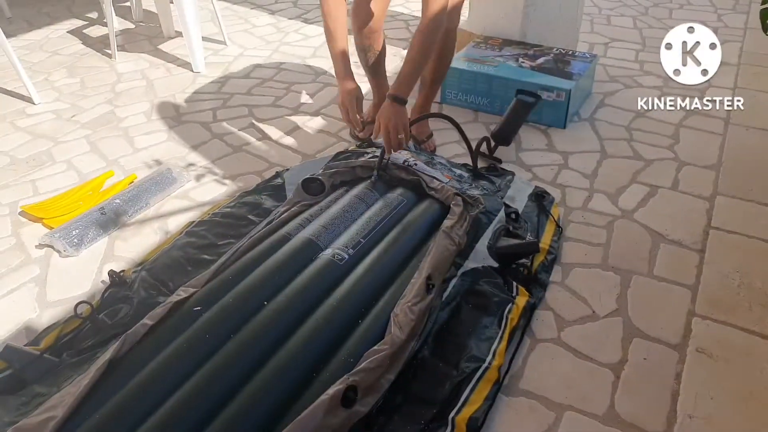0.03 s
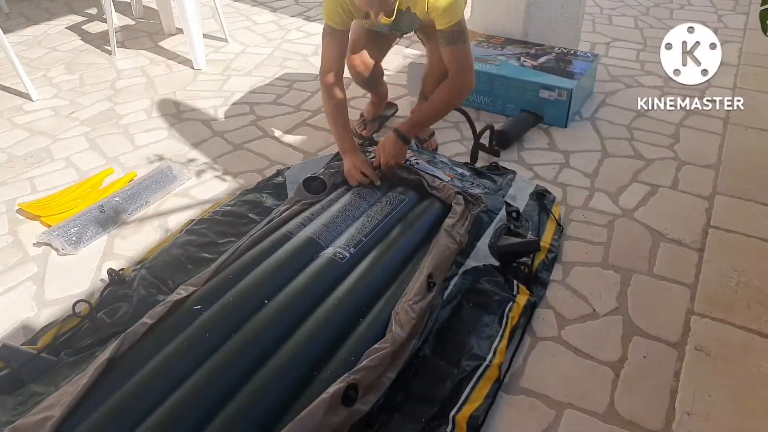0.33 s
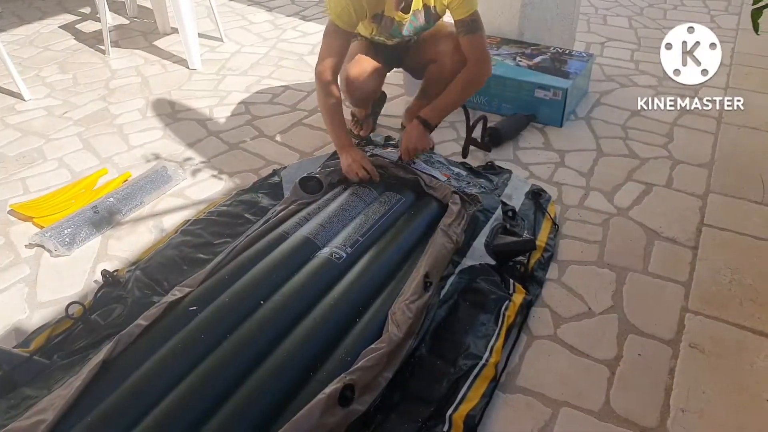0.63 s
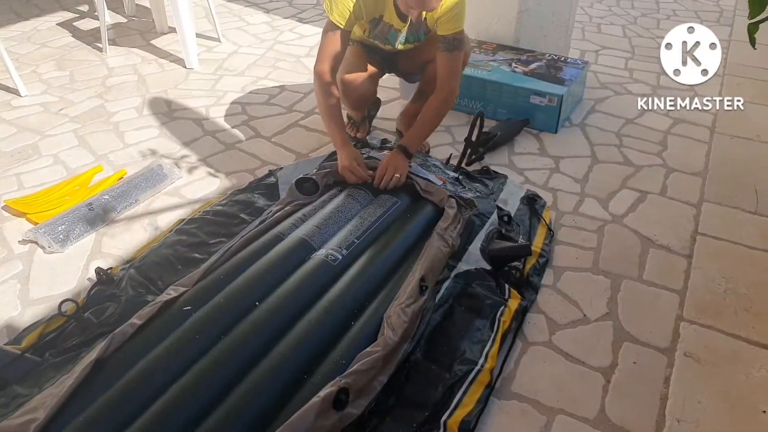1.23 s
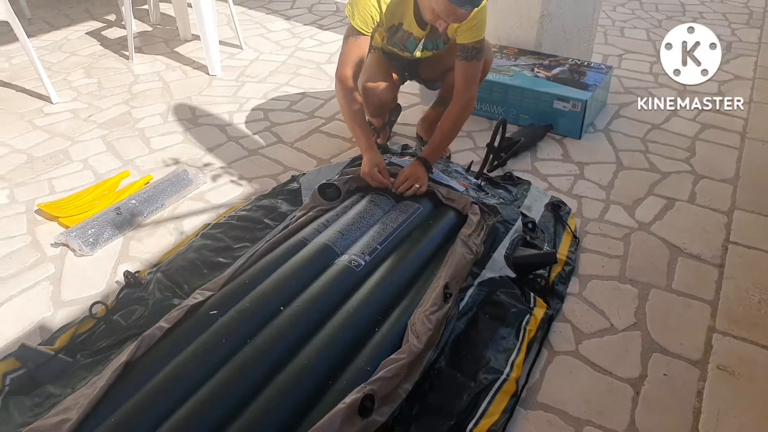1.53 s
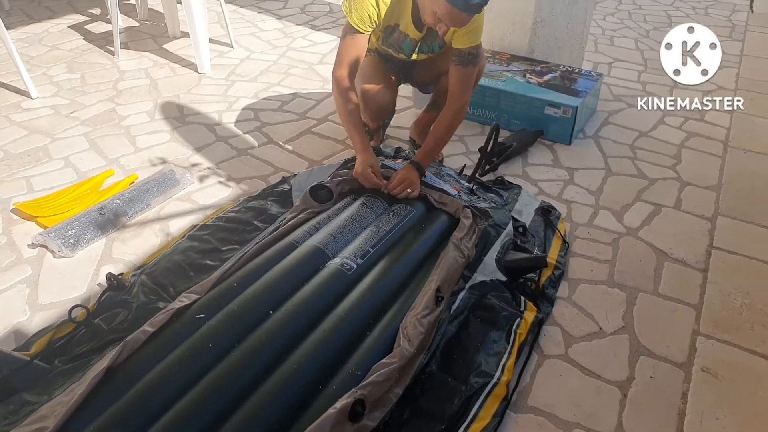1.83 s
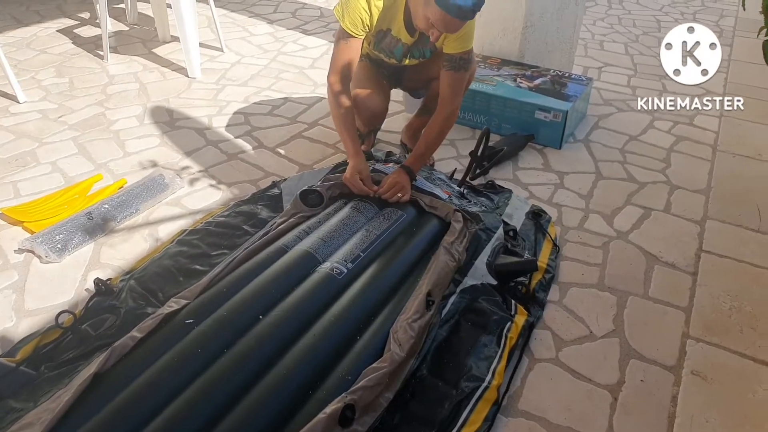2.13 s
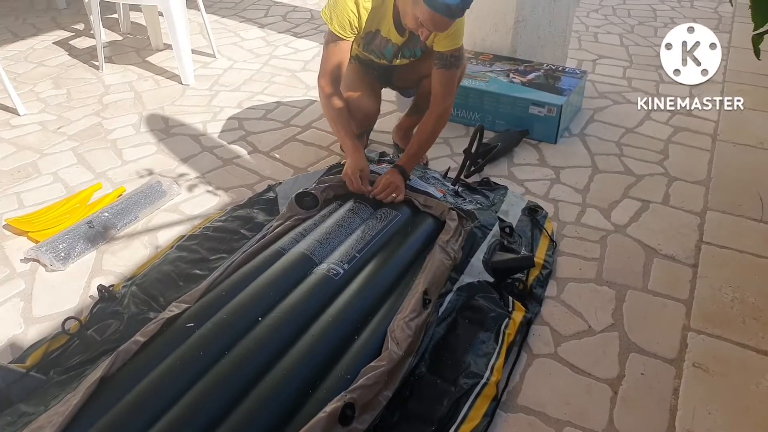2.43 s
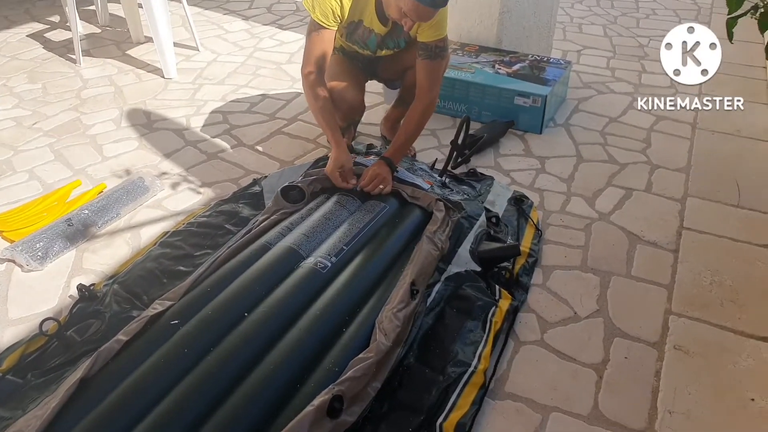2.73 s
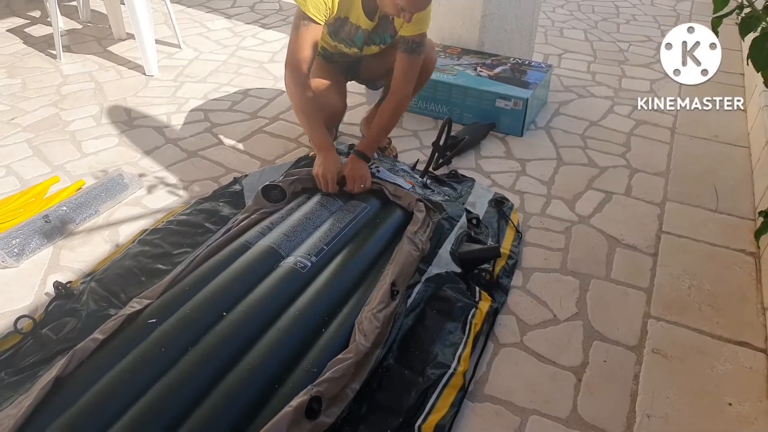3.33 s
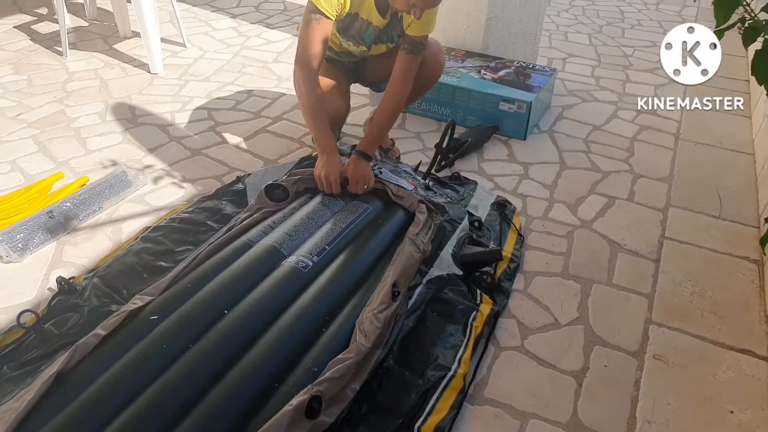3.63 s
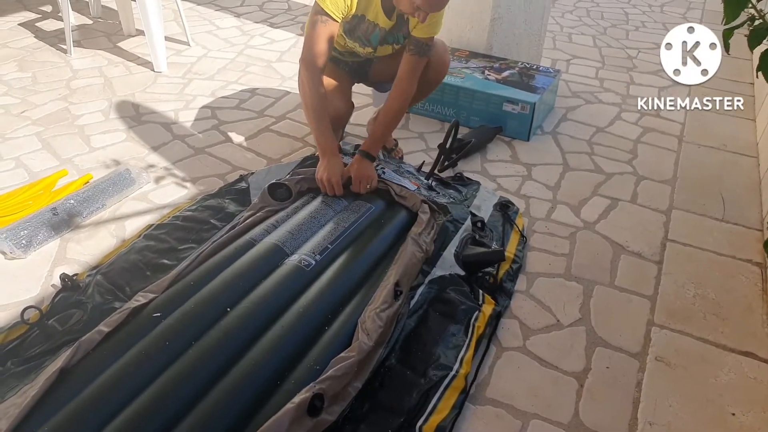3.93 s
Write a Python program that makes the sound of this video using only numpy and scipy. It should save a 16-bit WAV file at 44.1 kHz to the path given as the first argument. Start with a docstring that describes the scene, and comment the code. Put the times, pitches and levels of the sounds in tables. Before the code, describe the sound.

Air hisses from an inflatable boat's valve outdoors, surging at 0.2 seconds with sharp plastic snaps as a hose comes off. The hiss flutters with a slight whistle, with a soft knock near 1.4 seconds and faint, brief low hums around 0.5 and 2.2. It weakens after 2 seconds and stops at 2.6. Wind then buffets the microphone in irregular low thumps until 4 seconds, over faint rumble and rustling.

```python
"""A burst of air and plastic snaps: a pump hose is pulled off an inflatable boat's valve on a stone patio.
The turbulent jet hisses on and rings the valve throat, shaded by the fingers; it chokes, returns and
is shut off at 2.6 s. Fitting and hull knock as they are handled, and a soft low hum comes twice.
Then gusts buffet the two microphone ports, over a low outdoor rumble and a faint rustle."""
import sys
import numpy as np
from scipy import signal
from scipy.fft import rfft, irfft
from scipy.io import wavfile
from scipy.ndimage import uniform_filter1d

SR = 44100
rng = np.random.default_rng(int(sys.argv[2]) if len(sys.argv) > 2 else 0)


def persist_wave(psi):
    """Save psi, clipped to +-1, as 16-bit WAV."""
    counts = np.round(np.clip(psi, -1, 1) * 32767).astype(np.int16)
    wavfile.write(sys.argv[1], SR, np.atleast_2d(counts).T)


N = 176400
T = np.arange(N) / SR
F = np.maximum(np.fft.rfftfreq(N, 1 / SR), 1)
VALVE_PAN_DB, TOP_HZ = 1.3, 15450
DIFFUSE_DB = -3  # late scatter, unrelated at the two ports
SCATTER_FROM_HZ = 670  # body and hull scatter mainly short waves


def amp(db):
    """Decibels to gain."""
    return 10 ** (np.asarray(db) / 20)


def unit(x):
    """Scale to rms 1 in the mean of the channels."""
    return x / np.std(x.mean(axis=0))


def curve(table, column=1):
    """Table column, interpolated linearly over time."""
    rows = np.array(table, float)
    return np.interp(T, rows[:, 0], rows[:, column])


def colour(points):
    """Spectral gain from (frequency [Hz], level [dB]) points."""
    hz, db = np.array(points, float).T
    return amp(np.interp(np.log(F), np.log(hz), db))


def band(lo_hz, hi_hz, order):
    """Band-pass gain with smooth edges."""
    return 1 / np.sqrt((1 + (lo_hz / F) ** order) * (1 + (F / hi_hz) ** order))


def bell(hz, octaves, bins_hz=F):
    """Gain of a broad resonance."""
    return np.exp(-.5 * (np.log2(bins_hz / hz) / octaves) ** 2)


def noise(channels=2):
    """Spectra of independent white noises."""
    return rfft(rng.standard_normal((channels, N)))


def walk(rate_hz):
    """Smooth random drift, standard deviation 1."""
    drift = irfft(noise(channels=1)[0] * np.exp(-(2 * F / rate_hz) ** 2), N)
    return drift / drift.std()


def pan(left_minus_right_db):
    """Left and right gains of constant sum."""
    gains = amp(np.array([left_minus_right_db, -left_minus_right_db]).reshape(2, -1) / 2)
    return gains / gains.mean(axis=0)


def patio_paths(count=160, echo_db=0.5, decay_s=.012):
    """Valve-to-port responses: direct, plus scatter from body, paving and wall."""
    # direct path, left port ahead of right: (frequency [Hz], phase [rad])
    left_lead = [(100, 0), (2700, .1), (3300, 1.5), (3900, 3.1), (4500, 4.7), (5100, 5.9), (7200, 6.0),
                 (10000, 7.5), (12500, 8.7), (15000, 9.0)]
    lags_s = rng.uniform(.0005, 4 * decay_s, (2, count))
    gains = rng.standard_normal((2, count)) * np.exp(-lags_s / decay_s)
    taps = np.array([np.bincount((lag_s * SR).astype(int), gain / np.linalg.norm(gain), N)
                     for lag_s, gain in zip(lags_s, gains)])
    lead_rad = np.interp(F, *np.array(left_lead).T)
    direct = np.array([np.exp(1j * lead_rad), np.ones(len(F))])
    scattered = amp(echo_db) * rfft(taps) * F / (F + SCATTER_FROM_HZ)
    return (direct + scattered) * pan(VALVE_PAN_DB)


def jet(paths, flutter_hz=120, shut_s=2.603):
    """Fluttering turbulence at the valve; the fingers change its level and brightness."""
    # escaping air: (time [s], core level [dB], low rush, upper hiss, treble [dB re core])
    flow = [(0.0, -34.5, 4, -14, -10), (0.04, -46, 7, -8, -3.5), (0.14, -54.5, 6.5, -14, -1.5),
            (0.17, -39, 1, 4, 10.5), (0.18, -29, -7.5, -2.5, 0), (0.29, -34.5, -6, -13, 0),
            (0.3, -35, -6, -2, -1), (0.39, -39.5, -3, -1.5, 0), (0.43, -36, -7, -3.5, -4.5),
            (0.58, -39.5, -5.5, 1.5, -0.5), (0.75, -40.5, -4.5, 1, -3.5), (0.83, -41, -3.5, 0.5, -4),
            (0.9, -36.5, -9, -3.5, -10.5), (1.04, -40, -7, -8.5, -10), (1.21, -36.5, -12, -8.5, -12.5),
            (1.26, -36, -12.5, -12, -14), (1.34, -32, -15, -12.5, -16), (1.41, -37, -13, -11, -15.5),
            (1.47, -41.5, -13, -11, -11.5), (1.51, -36, -20, -16, -14), (1.63, -35, -12.5, -4.5, -12.5),
            (1.69, -35.5, -16.5, -9.5, -17.5), (1.78, -45, -2.5, -6.5, -3), (1.9, -37, -8, -8, -13),
            (1.96, -42.5, -3, -4, -4.5), (2.01, -49, -9, -6, -6.5), (2.12, -54, -1.5, -6, -2.5),
            (2.2, -72, -8, -16, -8), (2.22, -54.5, -7, -5, -3.5), (2.29, -49, -7, -4.5, 3.5),
            (2.36, -46, -2, 0, -4), (2.43, -49, -6.5, 0.5, 0), (2.52, -67, -7, -4, 1.5),
            (2.55, -86, 11, 4, 6)]
    # edges of low rush, core, upper hiss and treble [Hz]
    edges_hz = [300, 2300, 5350, 7200, 16000]
    # jet spectrum: (frequency [Hz], relative density [dB])
    spectrum = [(300, -11), (550, -19), (800, -8), (1100, -13.5), (1600, -6.5), (2020, -14.5), (2400, -3),
                (2850, 2.5), (3300, 2.5), (4000, 4), (4700, 1.5), (5100, -2), (5700, -2), (6400, 4),
                (6900, -4.5), (7450, -18.5), (8200, -15.5), (9300, -15.5), (11000, -14), (13000, -19),
                (14500, -18), (15400, -25.5)]
    # resonances of valve and hand: (centre [Hz], width [Hz], lift [dB])
    cavity = [(2250, 47, -2), (2700, 40, -0.5), (2730, 77, 6.5), (3035, 65, 7), (4093, 83, 4.5),
              (4480, 170, 4.5), (4940, 40, 11)]
    cavity_db = sum(db / (1 + (2 * (F - hz) / width_hz) ** 2) for hz, width_hz, db in cavity)
    path_power = uniform_filter1d(abs(paths.mean(axis=0)) ** 2, size=1600)
    path_gain = np.sqrt(path_power + amp(DIFFUSE_DB) ** 2 / 2)
    air = noise(channels=1) * paths + amp(DIFFUSE_DB) * noise() * F / (F + SCATTER_FROM_HZ)
    air = air * colour(spectrum) * amp(cavity_db) / path_gain  # keeps the paths' fine ripple
    core_db = curve(flow) + walk(flutter_hz)
    shading_db = [curve(flow, column=2), 0, curve(flow, column=3), curve(flow, column=4)]
    out = 0
    for lo_hz, hi_hz, shade_db in zip(edges_hz, edges_hz[1:], shading_db):
        hiss = unit(irfft(air * band(lo_hz, hi_hz, order=40), N))
        out = out + hiss * amp(core_db + shade_db)
    return out * np.clip((shut_s - T) / .04, 0, 1)


def handling(paths):
    """Damped snaps, knocks and scrapes of the plastic fitting and hull."""
    # (start [s], level [dB], rise [s], decay [s], centre [Hz], width [oct])
    knocks = [(.001, -31, .0003, 0.054, 700, 0.29), (0.014, -28.5, 0.00035, 0.011, 1710, 0.63),
              (0.019, -41, 0.0016, 0.027, 690, 0.14), (.164, -25, 0.0027, 0.021, 840, 1.6),
              (0.1831, -17, .0006, 0.0046, 5200, 1.24), (0.1874, -21.5, .0004, 0.0017, 2540, 1),
              (0.196, -23, 0.00033, .003, 6500, .9), (0.2159, -18, .0002, 0.0025, 1360, 1.2),
              (0.218, -24.5, 0.0014, 0.011, 1870, 0.71), (.222, -30.5, 0.0013, 0.02, 630, 0.21),
              (0.276, -27, 0.0071, 0.013, 720, 0.33), (.648, -39, .012, 0.035, 324, 0.72),
              (1.3, -51.5, 0.009, .11, 320, 0.28), (1.435, -36.5, 0.0051, 0.064, 684, 0.96),
              (1.46, -43, 0.0055, 0.073, 220, 0.99), (3.323, -50, .002, 0.018, 895, 0.64)]
    out = 0
    for start_s, db, rise_s, decay_s, hz, octaves in knocks:
        age_s = np.maximum(T - start_s, 0)
        envelope = (1 - np.exp(-age_s / rise_s)) * np.exp(-age_s / decay_s)
        excitation = noise(channels=1) * paths + amp(DIFFUSE_DB) * noise()
        ring = unit(irfft(excitation * bell(hz, octaves), N))
        out = out + amp(db) * envelope * ring
    return out


def rumble():
    """Low outdoor noise, partly common to both ports."""
    # rumble spectrum: (frequency [Hz], relative density [dB])
    spectrum = [(20, -4), (60, 7), (135, 0), (190, -2.5), (300, -1.5), (500, -11), (1000, -17.5),
                (2000, -40), (6000, -56)]
    # rumble strength: (time [s], level [dB])
    levels = [(0, -40.5), (.8, -54), (1.5, -48.5), (2.1, -51.5), (2.55, -50), (4, -52)]
    air = noise() + 1.17 * noise(channels=1)
    return unit(irfft(air * colour(spectrum), N)) * amp(curve(levels))


def throat(trim_db=-5.5, relative_width=0.065, wander_depth=.011, wander_hz=22):
    """The jet rings three modes of the valve throat; their pitch shifts as the fingers cover it."""
    # throat modes, each: (time [s], centre [Hz], relative level [dB])
    lower = [(0.15, 2810, -54), (0.17, 2775, -25), (.235, 2830, -34), (.27, 2900, -36), (0.33, 3060, -40),
             (.62, 3040, -39.5), (0.88, 3040, -42.5), (1.02, 2960, -37.5), (1.2, 2810, -33.5),
             (1.26, 2850, -59), (1.35, 2860, -42), (1.46, 2800, -39.5), (1.56, 2860, -41),
             (1.68, 2820, -38), (1.81, 2880, -49), (1.89, 2800, -29), (1.94, 2880, -39), (2.0, 2890, -47),
             (2.12, 2830, -49), (2.17, 2770, -73), (2.3, 2830, -45), (2.39, 2810, -46), (2.48, 2820, -58)]
    middle = [(1.0, 3480, -46), (1.12, 3400, -43), (1.22, 3480, -42), (1.35, 3520, -32.5),
              (1.46, 3630, -39), (1.55, 3610, -40), (1.68, 3540, -38), (1.76, 3580, -55), (1.89, 3500, -38),
              (1.98, 3470, -54)]
    upper = [(.16, 5370, -35), (.3, 5314, -34), (.9, 5290, -34), (1.05, 4970, -70), (1.21, 5030, -51),
             (1.26, 5030, -28.5), (1.33, 5020, -31), (1.4, 5030, -47), (1.48, 4980, -35.5),
             (1.7, 5040, -38.5), (1.93, 5150, -40), (2.15, 5050, -73), (2.3, 5020, -39.5),
             (2.47, 5120, -48)]
    out = 0
    for mode in (lower, middle, upper):
        start_s, start_hz, _ = mode[0]
        end_s = mode[-1][0]
        common = rng.standard_normal(N) + 1j * rng.standard_normal(N)
        per_port = rng.standard_normal((2, N)) + 1j * rng.standard_normal((2, N))
        lowpass = signal.butter(2, relative_width * start_hz / 2, fs=SR, output="sos")
        turbulence = signal.sosfilt(lowpass, common + 0.46 * per_port)
        hz = curve(mode) * (1 + wander_depth * walk(wander_hz))  # fingers are never quite still
        ring = unit((turbulence * np.exp(2j * np.pi * np.cumsum(hz) / SR)).real)
        gate = np.clip(np.minimum(T - start_s, end_s - T) / 0.011, 0, 1)
        out = out + ring * gate * amp(curve(mode, column=2) + trim_db)
    return out * pan(VALVE_PAN_DB)


def puffs(size=16384, common_gain=0.46, rasp_hz=890):
    """Single eddies thump the ports; small fast ones sound higher and rasp."""
    # (peak time [s], level [dB], half length [s], centre [Hz])
    eddies = [(0.154, -26, 0.01, 81), (0.225, -29, 0.011, 100), (0.322, -27.5, 0.01, 81),
              (0.411, -36, 0.026, 75.4), (0.613, -29.5, 0.008, 67.8), (0.721, -40, 0.027, 73),
              (1.431, -53, 0.06, 90.5), (1.87, -35, 0.013, 80), (1.945, -40.5, .016, 86.2),
              (2.402, -30, 0.011, 79.3), (2.448, -36.5, 0.013, 80), (2.596, -24, 0.007, 115),
              (2.613, -33, 0.0033, 290), (2.622, -22, 0.002, 270), (2.674, -26.5, 0.0073, 225),
              (2.757, -28.5, .004, 230), (2.784, -23, 0.0035, 205), (2.826, -32, 0.004, 280),
              (2.836, -19, 0.0059, 113), (2.857, -26.5, 0.0058, 197), (2.895, -23, 0.012, 85.5),
              (3.012, -30.5, .007, 170), (3.227, -25.5, 0.0056, 240), (3.281, -22.5, 0.0048, 96),
              (3.416, -23, 0.0038, 253), (3.43, -11.5, 0.0037, 132), (3.462, -20.5, 0.0035, 260),
              (3.474, -32.5, 0.011, 326), (3.494, -11.5, 0.0055, 110), (3.531, -20, .003, 139),
              (3.542, -18.5, 0.0037, 310), (3.571, -24, 0.0049, 176), (3.599, -30, 0.0044, 290),
              (3.652, -38, 0.0035, 380), (3.695, -42.5, 0.0028, 380), (3.71, -33, 0.0028, 110),
              (3.763, -25.5, 0.0054, 110), (3.854, -46.5, 0.0015, 600), (3.897, -32.5, 0.0038, 190),
              (3.923, -21.5, 0.0085, 70), (3.946, -47.5, 0.014, 500), (3.994, -35.5, 0.0049, 265)]
    out = np.zeros((2, N + size))
    offset_s = (np.arange(size) - size // 2) / SR
    bins_hz = np.maximum(np.fft.rfftfreq(size, 1 / SR), 1)
    for peak_s, db, half_s, hz in eddies:
        push = np.exp(-.5 * (offset_s / half_s) ** 2)
        body = bell(hz, octaves=0.54, bins_hz=bins_hz)
        rasp = amp(-37) * (hz / 300) ** 2 * bell(rasp_hz, octaves=0.72, bins_hz=bins_hz)
        air = rng.standard_normal((2, size)) + common_gain * rng.standard_normal(size)
        thump = push * irfft(rfft(air) * (body + rasp), size)
        thump *= np.sqrt(2 * np.sum(push ** 2) / np.sum(thump ** 2))
        first = int(peak_s * SR)
        out[:, first:first + size] += amp(db) * thump
    return out[:, size // 2:N + size // 2]


def hums():
    """A soft, nearly pure low tone with wavering pitch."""
    # (start [s], length [s], pitch [Hz], level [dB])
    tones = [(0.352, 0.14, 255, -48.5), (0.5, 0.1, 250.3, -40), (2.146, 0.22, 247.6, -51)]
    waver = 1 + 0.0143 * walk(rate_hz=22.7)
    out = 0
    for start_s, length_s, hz, db in tones:
        swell = np.sin(np.pi * np.clip((T - start_s) / length_s, 0, 1)).clip(0) ** 0.1
        tone = np.sqrt(2) * np.sin(2 * np.pi * np.cumsum(hz * waver) / SR)
        out = out + amp(db) * swell * tone
    return out


def rustle(right_lead_s=.00043, split_hz=7200):
    """Faint flickering rustle, as of leaves, reaching the right port first."""
    # rustle strength: (time [s], body, treble [relative dB])
    levels = [(2.56, -64, -67), (2.78, -57.5, -63), (3.28, -61.5, -67.5), (3.34, -58, -62.5),
              (3.45, -64.5, -73), (3.58, -63.5, -73.5), (3.73, -66.5, -80), (3.83, -64.5, -74.5),
              (3.92, -64.5, -66), (4.0, -62, -72)]
    # rustle spectrum: (frequency [Hz], relative density [dB])
    spectrum = [(600, -13.5), (1200, -1.5), (2000, 0), (3800, 1), (6500, -4.5), (7700, -13.5), (9500, -9),
                (12000, -8), (15000, -15.5)]
    port_delay = np.exp(-2j * np.pi * F * np.array([[right_lead_s], [0]]))
    leaves = (noise() + 0.68 * port_delay * noise(channels=1)) * colour(spectrum)
    body = unit(irfft(leaves * band(560, split_hz, order=24), N))
    treble = unit(irfft(leaves * band(split_hz, TOP_HZ, order=24), N))
    body *= amp(curve(levels) + 0.5)
    treble *= amp(curve(levels, column=2) - 1.5)
    return (body + treble) * amp(1.1 * walk(rate_hz=66))


def wind(start_s=2.577, rise_s=0.0044, reference_db=-26.5, eddy_hz=180):
    """Eddies hit each port on its own; stronger gusts reach higher in frequency."""
    # wind at the ports: (time [s], relative level [dB], left minus right [dB])
    gusts = [(2.555, -54, 7.5), (2.575, -28.5, 23), (2.591, -22, 16), (2.635, -32, -22), (2.675, -25.5, 4),
             (2.715, -30.5, 32), (2.763, -34, -3), (2.783, -26.5, 4), (2.807, -31, 4), (2.843, -27, -3),
             (2.871, -38.5, 8), (2.895, -29.5, 0), (2.969, -44, 6), (2.985, -38, 2), (3.037, -31, -11),
             (3.085, -36, 6), (3.121, -54, 14), (3.169, -36, -4), (3.217, -31, -4), (3.291, -31, 0),
             (3.311, -31.5, 4), (3.367, -32, 26), (3.391, -34, 10.5), (3.423, -26.5, 1), (3.475, -24, 6),
             (3.511, -26.5, 5), (3.579, -28, 24), (3.619, -39.5, 39), (3.765, -29.5, -3),
             (3.785, -40.5, 20), (3.835, -37, 16), (3.86, -46.5, 13), (3.925, -31.5, 1), (3.95, -37.5, 30),
             (4.0, -40.5, 12)]
    # wind spectrum: (frequency [Hz], relative density [dB])
    spectrum = [(12, -47), (20, -15), (54, 5.5), (103, 4), (151, -8.5), (187, -4.5), (275, -14.5),
                (380, -13.5), (606, -28.5), (925, -41), (1080, -43.5), (2000, -56), (2600, -82),
                (4400, -120)]
    # edges of the three wind bands [Hz]
    edges_hz = [15, 190, 420, 2500]
    trims_db, slopes = [0.5, -0.5, -1], [1, 3.1, 1.44]  # slope: band dB per gust dB
    air = noise() * colour(spectrum)
    air /= np.std(irfft(air, N).mean(axis=0))
    flicker_db = 2 * (np.array([walk(eddy_hz), walk(eddy_hz)]) - .3)
    gust_db = curve(gusts) - reference_db + flicker_db
    out = 0
    for lo_hz, hi_hz, trim_db, slope in zip(edges_hz, edges_hz[1:], trims_db, slopes):
        eddies = irfft(air * band(lo_hz, hi_hz, order=8), N)
        out = out + eddies * amp(reference_db + trim_db + slope * gust_db)
    onset = np.clip((T - start_s) / rise_s, 0, 1)
    return out * onset * pan(curve(gusts, column=2))


def scene():
    """Valve and handling on the patio, with wind on the microphone."""
    paths = patio_paths()
    return jet(paths) + handling(paths) + rumble() + throat() + puffs() + hums() + rustle() + wind()


def record(dry):
    """Steep low-pass at TOP_HZ."""
    return signal.sosfilt(signal.ellip(10, .2, 80, TOP_HZ, fs=SR, output="sos"), dry)


dry = scene()
out = record(dry)
persist_wave(out)
```